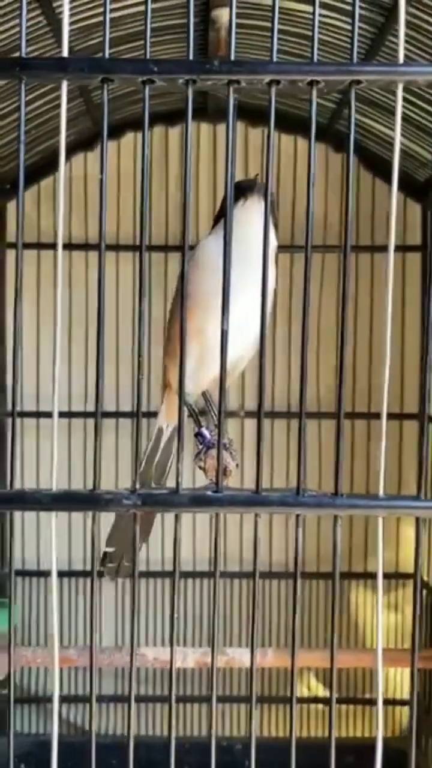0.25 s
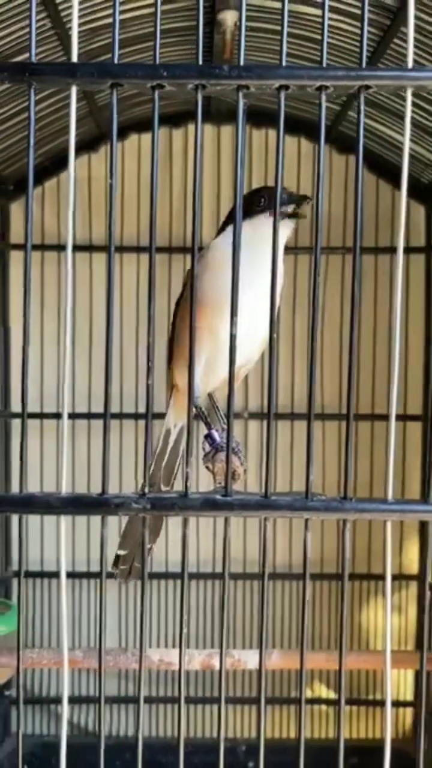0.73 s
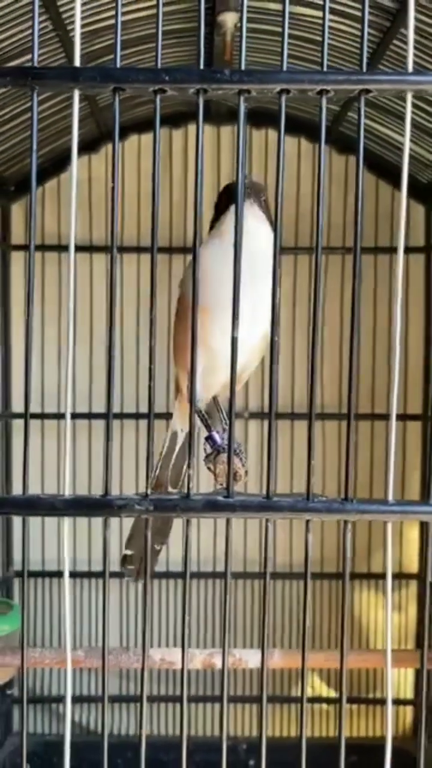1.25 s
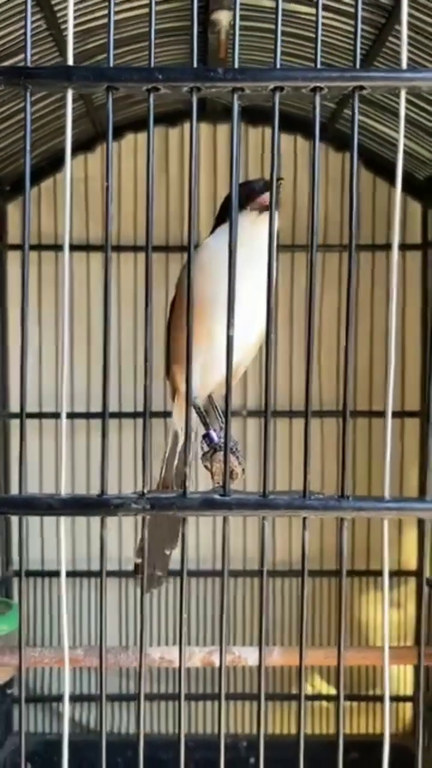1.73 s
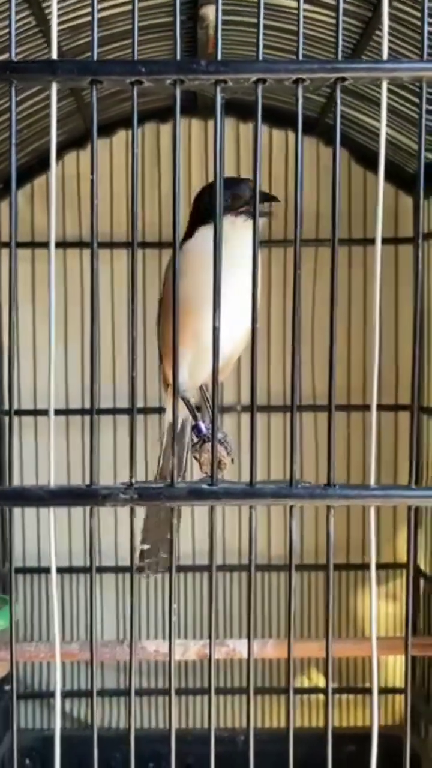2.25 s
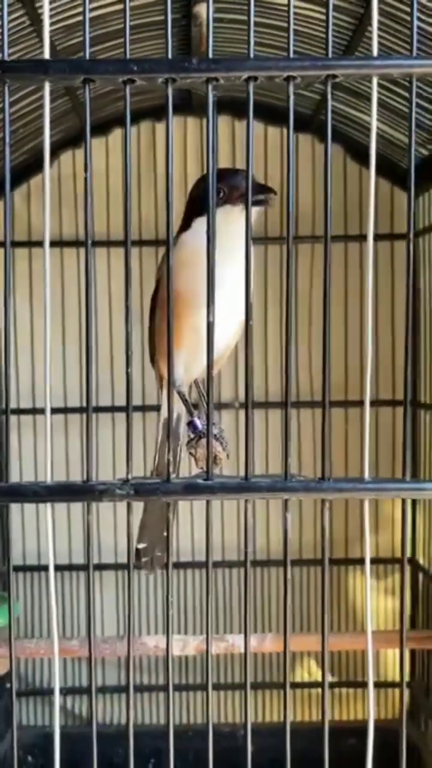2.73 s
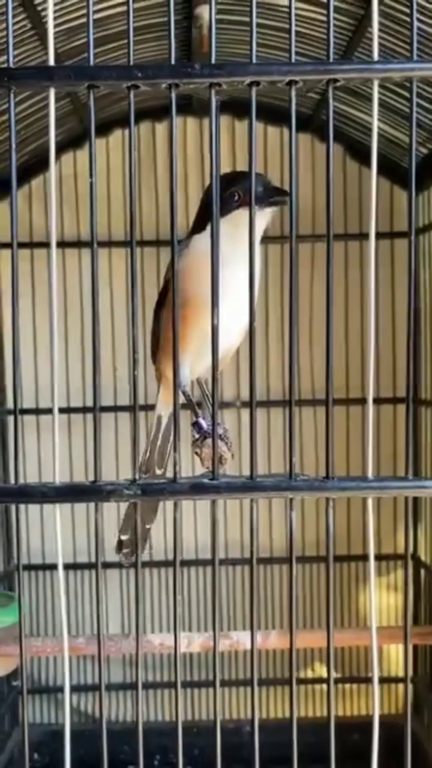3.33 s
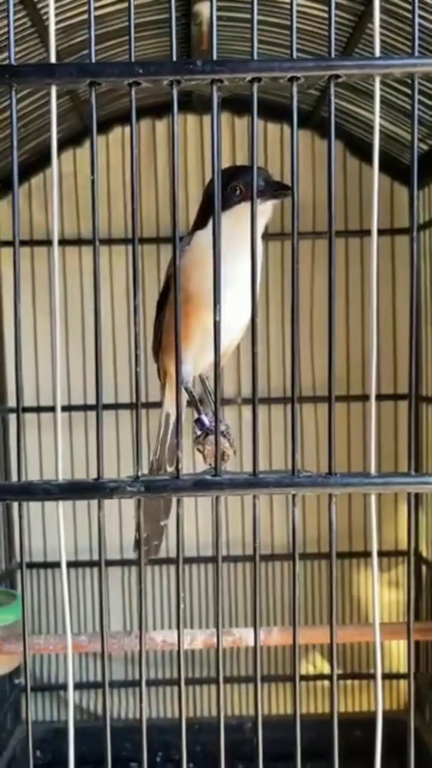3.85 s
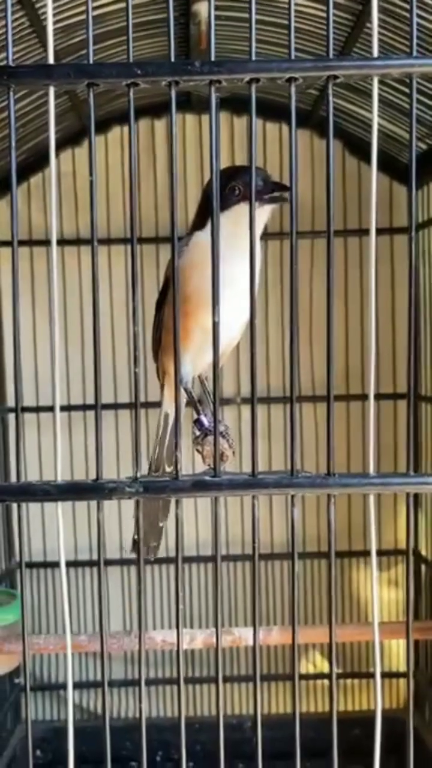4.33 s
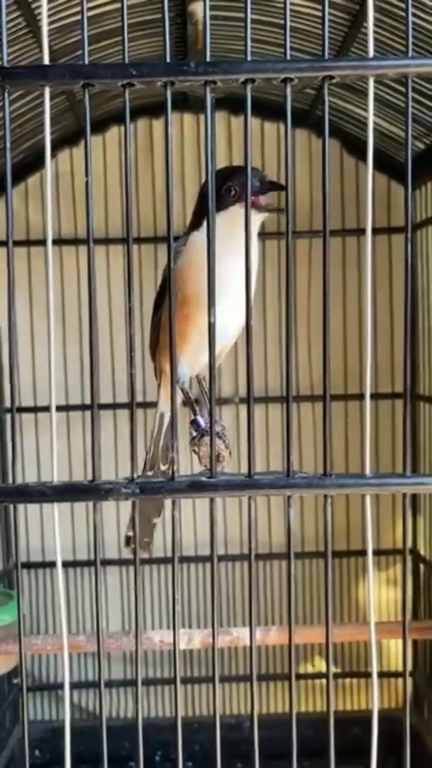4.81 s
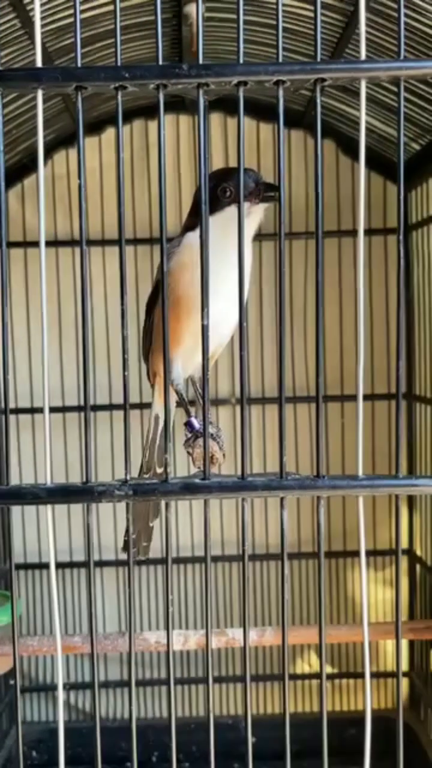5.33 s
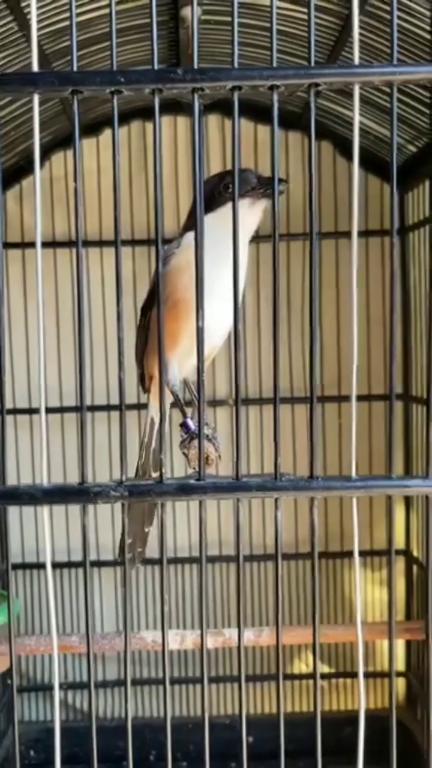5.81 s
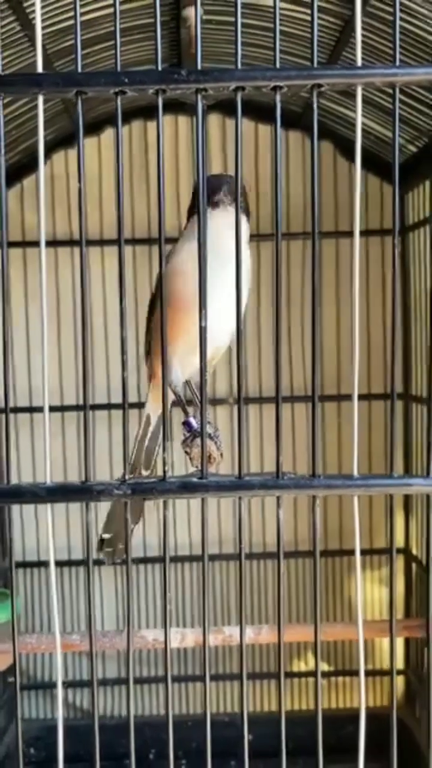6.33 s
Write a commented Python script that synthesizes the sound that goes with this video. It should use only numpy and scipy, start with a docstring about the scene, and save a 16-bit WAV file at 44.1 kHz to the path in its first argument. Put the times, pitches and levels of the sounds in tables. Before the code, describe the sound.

Thin, piercing bird whistles repeat evenly, turn to rapid dry ticks, then harsh chattering chirps, with hoarse squawks from another bird behind.

```python
"""In a room with a low rumble, a faint hum and soft air noise, a bird a little farther off squawks hoarsely.
From 0.4 s a caged shrike close to a phone sings thin falling whistles; at 2.4 s come dry ticks, then from
3.2 s raspy churrs and chirps, with more squawks behind and a second run of ticks at 4.8 s, up to 6.5 s.
Voices are swept tones with overtones and rasping noise; the room is filtered noise with wavering sines.
A short echo follows the birds to two microphones, and the phone's gain control ducks all after loud notes."""
import sys
import numpy as np
from scipy import signal
from scipy.fft import rfft, irfft
from scipy.io import wavfile
from scipy.ndimage import uniform_filter1d, minimum_filter1d

SR = 44100
rng = np.random.default_rng(int(sys.argv[2]) if len(sys.argv) > 2 else 0)


def store_wav(level_fs):
    """Save 16-bit WAV to argv[1]."""
    pcm = np.round(np.clip(np.atleast_2d(level_fs), -1, 1) * 32767)
    wavfile.write(sys.argv[1], SR, pcm.T.astype(np.int16))


N = 289296
TIME = np.arange(N) / SR  # s

# Slow level of the room noise. Each row: time [s], level [dB].
ROOM_LEVEL = [(0, -26), (.4, -21.5), (.72, -25), (.9, -24.5), (1.05, -26), (1.3, -29), (1.53, -28),
              (1.9, -30), (2.3, -33), (2.82, -26), (3.15, -27.5), (3.5, -30.5), (4.1, -28), (4.44, -27.5),
              (4.85, -28.5), (5.15, -26.5), (5.5, -30.5), (6.56, -24.5)]
# Spectrum of the low rumble. Each row: frequency [Hz], gain [dB].
RUMBLE_COLOUR = [(18, -47), (30, -38.5), (44, -1), (60, -6.5), (87, -0.5), (123, -5), (199, 1), (248, -9),
                 (350, -11), (390, -10), (450, -12), (700, -15.5), (1300, -20.5), (2000, -29), (3300, -89)]
# Spectrum of the air noise. Each row: frequency [Hz], gain [dB].
AIR_COLOUR = [(700, -15), (1400, -8), (2300, 2), (3300, -4.5), (4200, -6.5), (4900, -14), (5700, -7.5),
              (7000, -7.5), (7700, -9.5), (10500, -10.5), (12500, -27.5), (15000, -44)]
# Likeness of the room noise at left and right. Each row: frequency [Hz], likeness [share, 1 is the same].
ROOM_LIKENESS = [(170, 1), (280, .85), (500, .55), (1000, .5), (3000, .3), (12000, .3)]
# Partials of the hum. Each row: frequency [Hz], level against the rumble [dB].
HUM_PARTIALS = [(44, -7), (87, -9), (203, -13), (615, -23.5), (1298, -24)]
AIR_DB = -12  # air noise against the rumble

# Throat and open beak. Each row: frequency [Hz], gain [dB].
THROAT = [(800, -37), (1700, -50), (2500, 0.5), (4200, -3), (4900, -4.5), (5500, 3.5), (6600, 5.5),
          (7600, -5), (8800, -10), (10100, -1.5), (11200, -26), (13500, -15.5), (15500, -54)]
EDGE_HZ = 15500  # top of the band, for overtones and for the phone

# The farther bird. Each row: start [s], length [s], start pitch [Hz], end pitch [Hz], level [dB],
# hoarseness [0 clear, 1 hoarse].
SQUAWKS = [(0, 0.052, 4290, 4057, -16, 0.08), (0.039, 0.099, 2418, 3170, -19, 0.94),
           (0.131, 0.051, 3657, 3570, -17, 0.11), (0.173, 0.044, 2810, 3330, -21, 1.03),
           (0.223, .075, 2590, 3260, -18, 0.47), (0.277, .045, 3550, 3690, -19, 0.34),
           (3.423, 0.12, 3130, 3796, -17, .55), (3.567, 0.076, 3510, 3490, -24, 0.41),
           (3.779, 0.11, 2715, 2650, -27, 0.85), (3.852, 0.083, 3200, 3184, -15, 0.96),
           (4.095, 0.12, 2490, 2650, -26, 0.79), (4.178, 0.048, 3110, 3410, -16, 0.82),
           (4.295, 0.095, 3344, 3070, -18.5, 0.57), (4.461, .055, 3850, 4040, -21.5, 0.27),
           (4.501, 0.081, 2940, 3135, -23, 0.73), (4.601, .039, 4420, 4250, -24, 0.63),
           (6.541, 0.042, 3300, 3130, -15.5, 0.95)]
# Make-up of a squawk, in rows for tone, overtones and rasp. Each row: level when clear, when hoarse [dB].
SQUAWK_MIX = [(-1, -9), (-16, 1), (-14, -3)]
# Spectrum of the farther bird's hiss. Each row: frequency [Hz], gain [dB].
HISS_COLOUR = [(1500, -20), (2200, -1.5), (3500, 13), (4900, 5), (6200, 3.5), (7600, 1.5), (8600, 5.5),
               (10300, 3), (11800, 2), (13500, -19.5), (15000, -47)]
SQUAWK_WOBBLE, SQUAWK_SPURT_DB = .035, 4  # full-roughness wobble as a share of pitch; depth of hiss spurts
# Thin squeal above the first squawks. Each row: start [s], length [s], pitch [Hz], level [dB].
SQUEALS = [(.085, .11, 11545, -23)]

# Falling whistles. Each row: start of the lead-in [s], length after the 5 ms lead-in [s],
# pitch that the fast drop leads to [Hz], relative level [dB], glide time [s].
WHISTLES = [(.422, 0.05, 6385, 4.5, 0.0094), (0.723, 0.032, 6350, 8.5, 0.0093),
            (.907, 0.043, 6050, 10.5, 0.0064), (1.068, 0.045, 6020, 11.5, 0.0073),
            (1.231, 0.043, 5950, 10, 0.0081), (1.382, .044, 5956, 6.5, 0.0058),
            (1.54, 0.045, 5900, 7.5, 0.0082), (1.701, 0.044, 5855, 7, 0.0074),
            (1.848, 0.043, 5956, 8, .0062), (2.006, 0.045, 5940, 3, 0.0071),
            (2.171, 0.042, 5890, 2, 0.0086), (2.343, 0.013, 5560, 2.5, 0.005)]
# Dry ticks. Each row: start [s], relative level [dB], body below 4.5 kHz [dB, half of it applied].
TICKS = [(2.421, -5.5, 0.5), (2.4977, -7, -1), (2.574, -5.5, 5), (2.6554, -5, 2), (2.7326, -5, 11),
         (2.812, -2.5, 10), (2.8848, -3, 0), (2.9548, -3.5, 3), (3.034, -8, 5), (4.7908, 4.5, -11),
         (4.8637, 0, -12), (4.9327, -2, -1), (4.9991, -5.5, -9), (5.0713, -4.5, -1)]
# Mean spectrum of a tick before its body is set. Each row: frequency [Hz], gain [dB].
TICK_COLOUR = [(1200, -52), (2300, -24), (2750, -5), (3000, 1), (3550, -5.5), (4250, -5.5), (4900, -6),
               (5600, 2.5), (6500, 2), (7700, -5), (9000, -5), (10200, -4), (11300, -21.5), (13700, -24),
               (15400, -38)]

# Rising churrs. Each row: start [s], nominal length [s], middle pitch [Hz], relative level [dB],
# hoarseness [0 clear, 1 hoarse].
CHURRS = [(3.156, 0.032, 2508, 1.5, 0.19), (3.389, 0.038, 2674, 4, 0.4), (3.49, 0.045, 2276, 0.5, .9),
          (3.608, 0.04, 2157, 1, 0.95), (3.732, 0.03, 2470, 3.5, 0.43), (4.045, 0.036, 2166, 3, .65),
          (4.149, 0.034, 2240, 3, 1.09), (4.449, 0.037, 2520, 2, 0), (4.574, 0.036, 2450, 2.5, 0.1),
          (5.158, .037, 2696, 2, .1), (5.464, .033, 2372, 4.5, 0.71), (5.554, .038, 2276, -0.5, .8),
          (5.658, 0.037, 2115, 0.5, .85), (5.974, 0.04, 2577, 3.5, 0.32), (6.082, 0.032, 2197, 4.5, .8),
          (6.179, 0.038, 2174, 3, 0.76)]
# Make-up of a churr, in rows for tone, overtones and rasp. Each row: level when clear, when hoarse [dB].
CHURR_MIX = [(-12.5, -19), (-7.5, -11), (-24, -12.5)]
# Glide of a clear churr. Columns: pitch at start, knee and end [shares of the middle pitch].
CHURR_CLEAR = (.85, .93, 1.08)
# Glide of a hoarse churr. Columns: pitch at start, knee and end [shares of the middle pitch].
CHURR_HOARSE = (.71, .86, 1.13)
# Pitch of the flick closing a churr. Columns: when clear, when hoarse [Hz].
CHURR_FLICK_HZ = (5538, 5935)
# Level of that flick against the churr. Columns: when clear, when hoarse [dB].
CHURR_FLICK_DB = (-15.5, -2.5)
THROAT_BOOST = 1.05  # how closely a churr's overtones follow the throat's gain at twice the pitch

# Arched chirps. Each row: start [s], nominal length [s], start, top and end pitch [Hz], relative level [dB],
# hoarseness [0 clear, 1 hoarse], closing flick level [dB], flick pitch [Hz].
CHIRPS = [(3.27, 0.027, 3230, 3740, 3680, -4.5, 0.4, -4.5, 3022),
          (3.836, .034, 2490, 3520, 3373, 0, 0.6, -23, 4750),
          (3.944, 0.033, 1940, 3307, 2724, 4.5, 0.62, -4.5, 5450),
          (4.268, 0.033, 2244, 3150, 2620, -2, 0.46, -15, 5400),
          (5.259, 0.039, 3660, 4030, 3830, -3, 0.15, -17.5, 4160),
          (5.369, 0.032, 1955, 3674, 2980, 3.5, 0.73, -8.5, 5720),
          (5.77, .031, 2147, 3740, 4080, -3.5, 0.08, -10, 3630),
          (5.871, .034, 1563, 3490, 3196, 0, 0.1, -12, 4100),
          (6.288, 0.035, 1593, 3500, 4060, -4.5, 0, -0.5, 3530),
          (6.399, .033, 1713, 3350, 3750, 4.5, 0.18, 1, 3630),
          (6.498, 0.044, 1582, 3196, 2810, 7, 0.77, -6, 5220)]
# Make-up of a chirp, in rows for tone, overtones and rasp. Each row: level when clear, when hoarse [dB].
CHIRP_MIX = [(-6.5, -16), (-26, -20), (-26, -14.5)]
CHIRP_LEAP = .66  # share of the climb made in the opening leap
CHIRP_FALL_HZ, CHIRP_FALL_S, CHIRP_FALL_DB = 2881, 0.018, -14  # a second strand drops to this pitch

# Decay of the echo tail. Each row: frequency [Hz], time to fall by 60 dB [s].
ECHO_DECAY = [(1000, 0.2), (3000, 0.44), (6000, 0.25), (12000, 0.34)]
# Colour that cage and wall give to the birds. Each row: frequency [Hz], gain [dB].
CAGE_COLOUR = [(1500, -4.5), (2000, -5), (2420, 3.5), (2750, -0.5), (3000, 0.5), (3300, -3), (3750, 0.5),
               (4200, 7.5), (4900, -3), (5400, 5), (6100, 2.5), (7600, 1.5), (8300, 2), (13500, 3.5)]
# Difference of the microphones, a quarter cycle apart. Each row: frequency [Hz], side against mid [ratio].
PORT_LEAD = [(600, -0.077), (1000, 0.3), (1300, .6), (1600, -0.033), (2650, 0.17), (3300, -1.75),
             (4200, -0.45), (4900, -2.6), (5500, -0.16), (6500, 0.22), (7200, 1.13), (7700, 0.32),
             (8100, 0.76), (11000, 0.54), (12600, -0.59)]
# Difference of the microphones, in step. Each row: frequency [Hz], side against mid [ratio].
PORT_LEAN = [(300, -0.3), (1200, -0.45), (1800, 0.17), (2900, -0.18), (3400, 0.18), (4000, 0.37),
             (4800, 0.074), (5400, 0.26), (6200, -0.054), (12000, 0.02)]
CEILING_DB, HOLD_S, RECOVER_DB_PER_S = -1.5, 0.021, 83  # the phone's gain control
PEAK_LIMIT = 0.96  # limiter threshold, as a share of full scale


def gain_of(db):
    """Decibels as an amplitude ratio."""
    return 10 ** (np.asarray(db) / 20)


def evened(x):
    """The signal scaled to rms 1."""
    return x / np.sqrt(np.mean(x ** 2) + 1e-20)


def read(points, hz):
    """A table of (Hz, value) read on a log-frequency axis."""
    table_hz, value = np.transpose(points)
    return np.interp(np.log(hz + 1), np.log(table_hz + 1), value)


def add(mix, s, sound):
    """Lay a sound into the mix at s seconds, cut off at the end."""
    part = mix[max(round(s * SR), 0):][:len(sound)]
    part += sound[:len(part)]


def noise(size, colour):
    """Noise of rms 1 with the given spectrum."""
    gain = gain_of(read(colour, np.fft.rfftfreq(size, 1 / SR)))
    return evened(irfft(rfft(rng.standard_normal(size)) * gain, size))


def wander(size, hz):
    """Random drift of rms 1, mostly slower than hz."""
    f = np.fft.rfftfreq(size, 1 / SR)
    lowpass = (f > 0) / (1 + (f / hz) ** 4)
    return evened(irfft(rfft(rng.standard_normal(size)) * lowpass, size))


def stereo_noise(colour):
    """Room noise at two microphones, alike in the bass and less so higher up."""
    same = np.clip(read(ROOM_LIKENESS, np.fft.rfftfreq(N, 1 / SR)), -1, 1)
    left, other = noise(N, colour), noise(N, colour)
    right = irfft(same * rfft(left) + np.sqrt(1 - same ** 2) * rfft(other), N)
    return np.array([left, right])


def hum():
    """Low steady partials whose phases waver slowly."""
    total = np.zeros(N)
    for hz, db in HUM_PARTIALS:
        phase = 2 * np.pi * hz * TIME + 0.53 * wander(N, 3.45)
        total += gain_of(db) * evened(np.sin(phase))
    return total


def background():
    """A low rumble and hum with soft air noise above, swelling and sinking together."""
    level = gain_of(np.interp(TIME, *np.transpose(ROOM_LEVEL)))
    return level * (stereo_noise(RUMBLE_COLOUR) + hum() + gain_of(AIR_DB) * stereo_noise(AIR_COLOUR))


def ragged(colour, depth_db, step_hz):
    """A spectrum with chance peaks and dips, as the throat never takes quite the same shape twice."""
    hz = np.arange(800, 16000, step_hz)
    return np.transpose([hz, read(colour, hz) + depth_db * rng.standard_normal(len(hz))])


def blend(mix, hoarse):
    """Levels of tone, overtones and rasp for a note between clear and hoarse."""
    clear_db, hoarse_db = np.transpose(mix)
    return clear_db + hoarse * (hoarse_db - clear_db)


def syrinx(hz, jitter, jitter_hz):
    """A fluttering membrane: fundamental, overtones shaped by the throat, and air pulsed at its pitch."""
    size = len(hz)
    phase = 2 * np.pi * np.cumsum(hz * (1 + jitter * wander(size, jitter_hz))) / SR
    overtones = np.zeros(size)
    for k in range(2, 8):
        throat_gain = gain_of(read(THROAT, k * hz)) * (k * hz < EDGE_HZ)
        overtones += throat_gain * np.sin(k * phase) / k ** 1.4
    rasp = noise(size, THROAT) * (1 + .5 * np.cos(phase))
    # the unsteadier the pitch, the more the loudness stutters too
    stutter_db = np.minimum(130 * jitter, 3.5) * wander(size, 214)
    grain_db = 3.5 * wander(size, 500)
    return (evened(np.sin(phase) * gain_of(stutter_db)),
            evened(overtones * gain_of(1.16 * stutter_db)),
            evened(rasp * gain_of(grain_db)))


def squawk(length, start_hz, end_hz, tone_db, overtones_db, rasp_db):
    """A gliding call that wobbles as it roughens, wrapped in streaky hiss that comes in ragged spurts."""
    size = int(length * SR)
    rough = gain_of(.7 * np.clip(rasp_db - max(tone_db, overtones_db), -20, 0))
    hz = np.linspace(start_hz, end_hz, size) * (1 + SQUAWK_WOBBLE * rough * wander(size, 90))
    tone, overtones, rasp = syrinx(hz, 0.038 * rough, 650)
    hiss = np.zeros(size)
    for _ in range(2):
        spurts = gain_of(SQUAWK_SPURT_DB * wander(size, 70))
        hiss += noise(size, ragged(HISS_COLOUR, 6, step_hz=200)) * spurts
    call = gain_of(tone_db) * tone + gain_of(overtones_db) * overtones
    call += gain_of(rasp_db) * (.2 * rasp + 0.81 * evened(hiss))
    return call * signal.windows.tukey(size, .45)


def squeal(length, hz, db):
    """A faint, steady, very high sine."""
    t = np.arange(int(length * SR)) / SR
    return gain_of(db) * np.sin(2 * np.pi * hz * t) * signal.windows.tukey(len(t), .5)


def whistle(length, hz, db, glide):
    """A near-pure note: creeps in fluttering, drops fast, then steadies, sinks slowly and fades."""
    t = np.arange(-.005, length, 1 / SR)
    age = np.maximum(t, 0)
    fast_drop = (7750 - hz) * np.exp(-(age / glide) ** 1.4)
    slow_sink = 260 * (.8 - t / length)
    pitch = hz + fast_drop + slow_sink
    flutter = np.exp(-(age / (0.94 * glide)) ** 2)
    jitter = (0.08 * flutter + 0.00068) * wander(len(t), 1300)
    phase = 2 * np.pi * np.cumsum(pitch * (1 + jitter)) / SR
    swell = np.interp(t, [-.005, 0, .002, .0055, 0.42 * length, 0.76 * length, 0.99 * length, length],
                      [0.014, 0.026, 0.021, 0.39, 0.74, 0.24, 0.096, .015])
    octave_and_breath = gain_of(-23.5) * np.sin(2 * phase) + gain_of(-26.0) * noise(len(t), THROAT)
    tone = np.sin(phase) + flutter * octave_and_breath
    shake = (.5 * flutter + .06) * wander(len(t), 450)
    return gain_of(db + 2.5) * swell * tone * (1 + shake)


def tick(db, body_db):
    """A few milliseconds of harsh, spiky noise coloured by the throat."""
    t = np.arange(int(0.034 * SR)) / SR
    bodied = [(hz, level + .5 * body_db * (hz < 4500)) for hz, level in TICK_COLOUR]
    colour = ragged(bodied, 3.5, step_hz=330)
    decay = 1 / (1 + (t / 0.0059) ** 6) + 0.026 * np.exp(-t / 0.0027)
    burst = np.minimum(t / 0.0025, 1) * decay
    spikes = gain_of(2 * wander(len(t), 870))
    # 5 ms of silence leads in, so the filter can spread both ways
    air = np.pad(burst * rng.standard_normal(len(t)) * spikes, (SR // 200, 0))
    shaped = irfft(rfft(air) * gain_of(read(colour, np.fft.rfftfreq(len(air), 1 / SR))))
    return gain_of(db - 18.0) * evened(shaped)


def syllable(length, start_hz, knee_hz, middle_hz, end_hz, tone_db, overtones_db, rasp_db):
    """A rising or arching note; as pressure builds it grows brighter, then breaks up into a rasp."""
    u = np.arange(int(1.2 * length * SR)) / (length * SR)  # share of the nominal length
    hz = np.interp(u, [0, .22, .6, 1], [start_hz, knee_hz, middle_hz, end_hz])
    breaking = np.clip((u - .68) / 0.26, 0, 1)
    hoarse = gain_of(0.51 * np.clip(rasp_db - max(tone_db, overtones_db), -20, 3))
    tone, overtones, rasp = syrinx(hz, 0.025 * hoarse + 0.004 + 0.031 * breaking, 1100)
    # the second side of the syrinx beats against the first and splits the note into strands
    beat_cycles = rng.uniform(350, 700) * length * u + rng.random()
    beat = 1 + (.3 * hoarse + .35 * breaking) * np.sin(2 * np.pi * beat_cycles)
    # after a steep opening leap the voice catches for a moment
    leap = np.clip((knee_hz / start_hz - 1.2) / 0.35, 0, 1)
    voice = beat * gain_of(-10 * leap * np.exp(-((u - .38) / 0.12) ** 2))
    tone_swell = np.interp(u, [0, .22, .65, .84, 1.02], [0.26, 0.63, 0.87, 1.03, 0.13])
    overtone_swell = np.interp(u, [0, .35, .68, .88, 1.04], [0.038, 0.24, 0.5, 0.94, 0.11])
    rasp_swell = np.interp(u, [0, .45, .95, 1.15, 1.4], [0.11, 0.19, 0.71, 0.94, .03])
    return (gain_of(tone_db) * tone * voice * tone_swell
            + gain_of(overtones_db) * overtones * voice * overtone_swell
            + gain_of(rasp_db) * rasp * rasp_swell)


def flick(db, hz):
    """The syllable snaps shut with a rough upward sweep over a weaker, lower partial."""
    t = np.arange(int(0.026 * SR)) / SR
    pitch = hz * np.interp(t, [0, .004, .009, .02], [.82, .95, 1.05, .98])
    tone, overtones, rasp = syrinx(pitch, 0.082, 1350)
    # an octave below, but never under 2600 Hz
    lower = syrinx(np.maximum(pitch / 2, 2600), 0.029, 790)[0]
    swell = np.interp(t, [0, .0045, .008, .0105, .02], [0, 0.63, 1.0, 0.12, 0.084])
    voice = tone + gain_of(-12) * lower + gain_of(-28) * overtones + gain_of(-11) * rasp
    return gain_of(db) * swell * voice


def closed(note, length, flick_db, flick_hz):
    """A note with the flick that ends it."""
    out = np.pad(note, (0, SR // 20))
    add(out, length - .005, flick(flick_db, flick_hz))
    return out


def churr(length, hz, db, hoarse):
    """A rising note, brightest when its octave meets the throat; hoarseness steepens climb and flick."""
    glide = (1 - hoarse) * np.array(CHURR_CLEAR) + hoarse * np.array(CHURR_HOARSE)
    start_hz, knee_hz, end_hz = hz * glide
    tone_db, overtones_db, rasp_db = db + blend(CHURR_MIX, hoarse)
    overtones_db += THROAT_BOOST * read(THROAT, 2 * hz)
    note = syllable(length, start_hz, knee_hz, hz, end_hz, tone_db, overtones_db, rasp_db)
    flick_db = db + np.interp(hoarse, [0, 1], CHURR_FLICK_DB)
    return closed(note, length, flick_db, np.interp(hoarse, [0, 1], CHURR_FLICK_HZ))


def chirp(length, start_hz, top_hz, end_hz, db, hoarse, flick_db, flick_hz):
    """A purer note that leaps up, then splits: one strand flicks upward while the other drops."""
    knee_hz = start_hz + CHIRP_LEAP * (top_hz - start_hz)
    note = syllable(length, start_hz, knee_hz, top_hz, end_hz, *(db + blend(CHIRP_MIX, hoarse)))
    out = closed(note, length, flick_db, flick_hz)
    fall_hz = np.geomspace(top_hz, CHIRP_FALL_HZ, int(CHIRP_FALL_S * SR))
    strand = syrinx(fall_hz, 0.036, 780)[0] * signal.windows.tukey(len(fall_hz), .6)
    add(out, .8 * length, gain_of(db + CHIRP_FALL_DB) * strand)
    return out


def room(x, near_db, tail_db):
    """Quick scatter from the cage and wall, then a thin tail whose decay time varies with frequency."""
    size = SR // 2
    # sparse random reflections, about 3000 a second, none before 2 ms
    struck = (rng.random((2, size)) < 3000 / SR) * (np.arange(size) > .002 * SR)
    taps = rng.choice([-1., 1.], (2, size)) * struck
    hz, t, z = signal.stft(taps, SR, nperseg=256)
    decay = gain_of(-60 * t / read(ECHO_DECAY, hz)[:, None])
    tail = signal.istft(z * decay, SR, nperseg=256)[1][:, :size]
    near = taps * np.exp(-TIME[:size] / 0.0067)
    echo = np.zeros((2, size))
    for db, part in [(near_db, near), (tail_db, tail)]:
        echo += gain_of(db) * part / np.linalg.norm(part, axis=1, keepdims=True)
    return signal.fftconvolve(x[None], echo, axes=1)[:, :N]


def ports(x):
    """Coloured by the cage, the birds reach two microphones out of step and at unlike strength by band."""
    hz = np.fft.rfftfreq(N, 1 / SR)
    side = read(PORT_LEAN, hz) + 1j * read(PORT_LEAD, hz)
    return irfft(rfft(x) * gain_of(read(CAGE_COLOUR, hz)) * np.array([1 + side, 1 - side]), N)


def scene():
    """The shrike close by, the other bird deeper in the room, and the room's own noise."""
    shrike, neighbour = np.zeros((2, N))
    for s, length, start_hz, end_hz, db, hoarse in SQUAWKS:
        levels_db = db + blend(SQUAWK_MIX, hoarse)
        add(neighbour, s, squawk(length, start_hz, end_hz, *levels_db))
    for s, *call in SQUEALS:
        add(neighbour, s, squeal(*call))
    for s, *note in WHISTLES:
        add(shrike, s, whistle(*note))
    for s, *note in TICKS:
        add(shrike, s - .005, tick(*note))  # earlier by the silent lead-in
    for s, *note in CHURRS:
        add(shrike, s, churr(*note))
    for s, *note in CHIRPS:
        add(shrike, s, chirp(*note))
    birds = shrike + neighbour
    echoes = room(shrike, near_db=-10.5, tail_db=-22.5) + room(neighbour, near_db=-6.0, tail_db=-7.5)
    return gain_of(-1.0) * ports(birds + echoes) + background()


def record(dry):
    """Gain control ducks loud notes, holds, then recovers; a fast limiter and the band limit follow."""
    power = uniform_filter1d(dry ** 2, size=128, axis=1)
    level_db = 10 * np.log10(2 * abs(power).max(0) + 1e-12)  # the louder microphone rules both
    hold = int(HOLD_S * SR)
    held_db = minimum_filter1d(np.minimum(CEILING_DB - level_db, 0), hold, origin=(hold - 1) // 2)
    # the gain may fall at once but climbs no faster than this ramp
    rise_db = RECOVER_DB_PER_S * TIME
    ducked = dry * gain_of(np.minimum.accumulate(held_db - rise_db) + rise_db)
    headroom = np.minimum(PEAK_LIMIT / (abs(ducked).max(0) + 1e-9), 1)
    limited = ducked * uniform_filter1d(minimum_filter1d(headroom, size=96), size=96)
    lowpass = signal.firwin(255, EDGE_HZ, window=("kaiser", 8), fs=SR)
    return signal.oaconvolve(limited, lowpass[None], "same")


dry = scene()
out = record(dry)
store_wav(out)
```